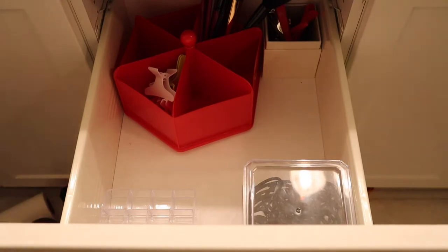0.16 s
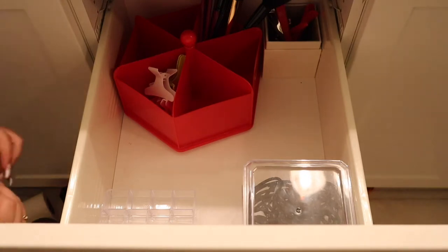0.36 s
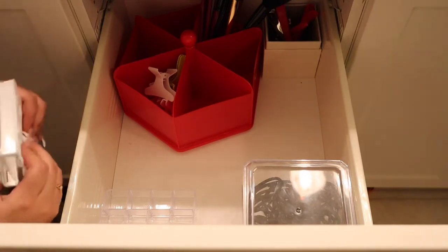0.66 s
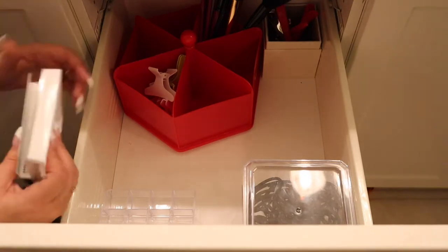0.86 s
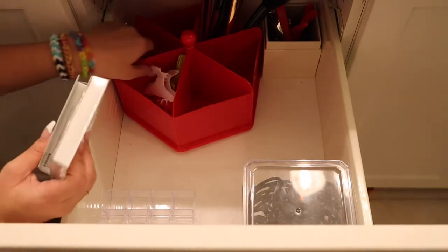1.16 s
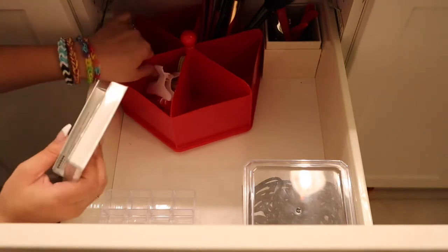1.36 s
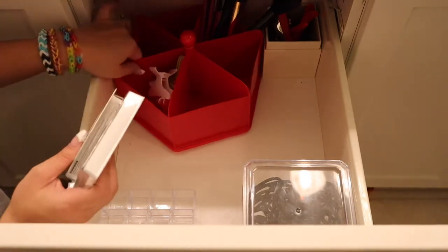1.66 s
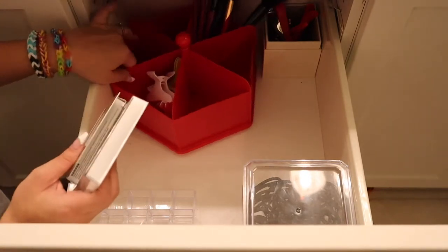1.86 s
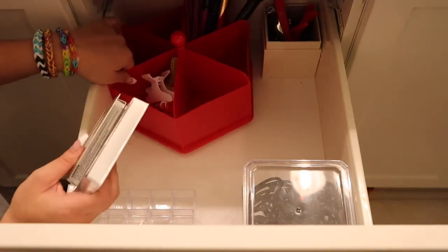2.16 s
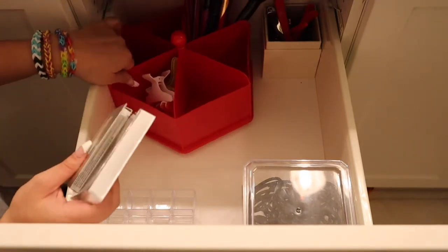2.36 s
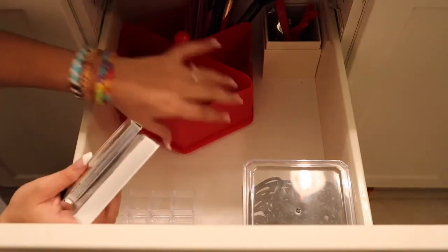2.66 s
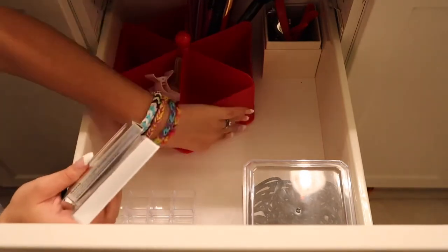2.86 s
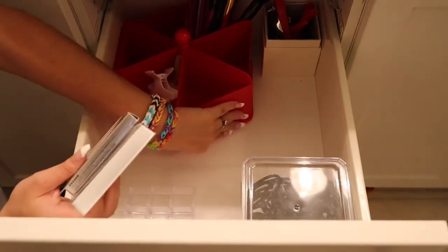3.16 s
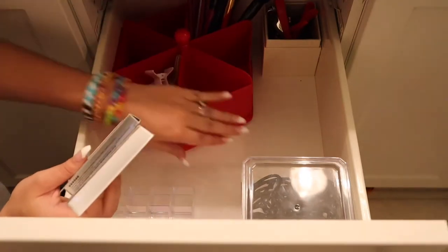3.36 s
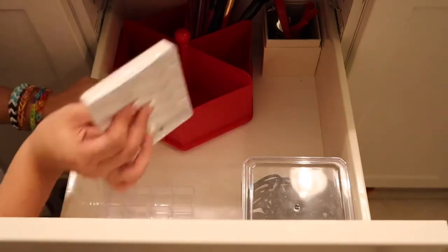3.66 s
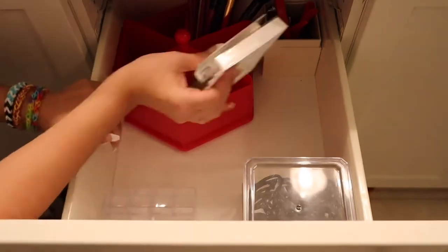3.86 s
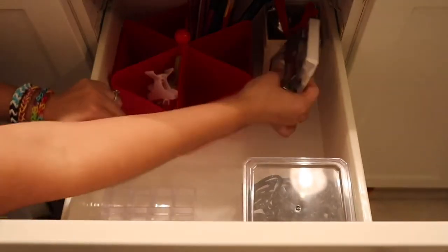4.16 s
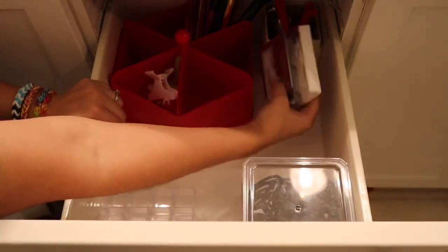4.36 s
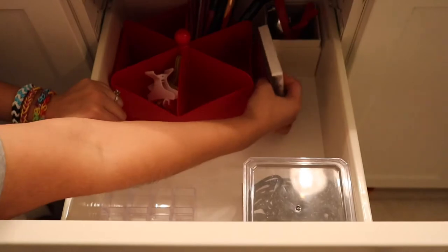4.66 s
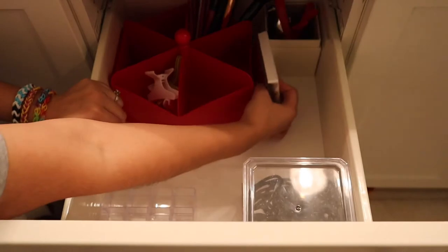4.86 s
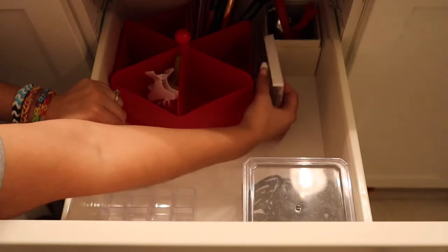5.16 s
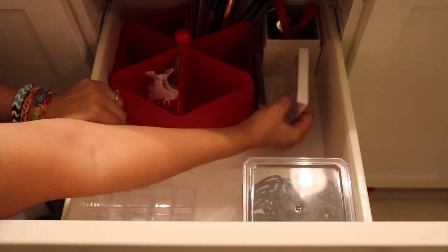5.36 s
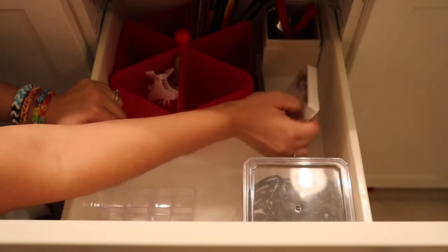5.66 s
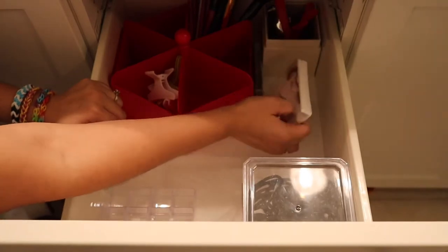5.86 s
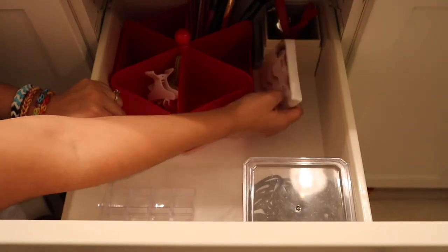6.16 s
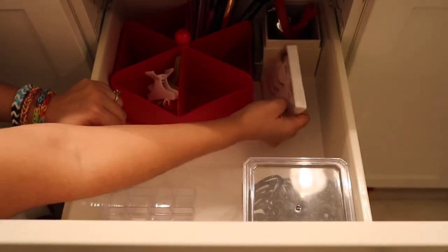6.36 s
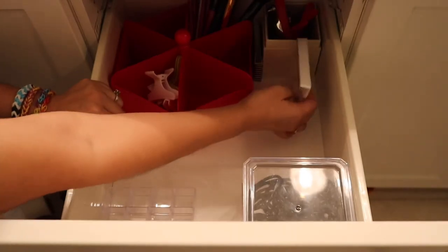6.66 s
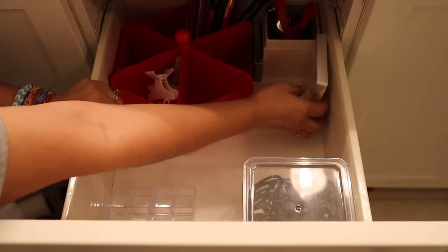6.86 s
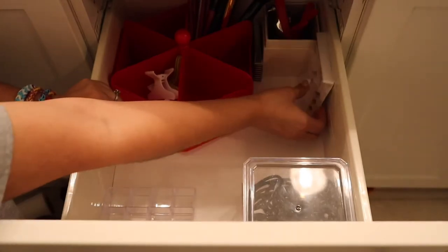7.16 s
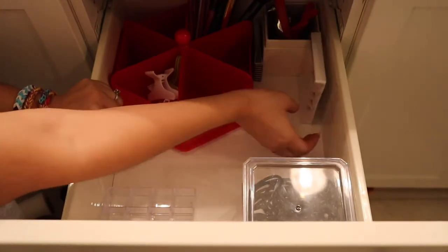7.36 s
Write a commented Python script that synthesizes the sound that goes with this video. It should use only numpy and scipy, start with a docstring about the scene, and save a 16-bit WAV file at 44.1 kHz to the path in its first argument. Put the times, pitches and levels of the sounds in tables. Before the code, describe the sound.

A steady, soft mid-toned hiss runs throughout, in a small room close to the microphone. From 0 to 1 s there is faint finger rubbing with tiny plastic ticks. At 1.07 s a sharp bright click sounds, followed by brushing, a short scrape and smaller taps; a louder, lower plastic snap comes at 1.43 s with light knocks. Around 1.9 to 2.0 s an organiser judders and hits the drawer with a strong hollow thud. Small taps follow, then another hard, brighter woody knock with a short scrape at 2.84 s. Near 3.55 to 3.75 s come rubbing and a cluster of light clicks. It then stays sparse: a soft knock at 4.4, a dull double bump at 5.0, ticks at 5.3. Rubbing and small taps return from 5.7, swelling before a loud plastic case clack at 6.84 s, with brief chatter and short room echo. Hiss and a faint tick at 7.15 s end it.

```python
"""A wooden drawer in a small room: hands rearrange makeup close to the microphone, over a steady hiss.
Fingers and a plastic organiser slide (friction noise); nails and small plastic parts click (crack and short ring).
Blows on the drawer combine contact noise with damped modes; a flat palette case finally clacks into its place
with its own modes and a chatter. Drawer walls and room add decaying echoes."""
import sys
import numpy as np
from scipy import signal
from scipy.fft import rfft, irfft, next_fast_len
from scipy.io import wavfile
from scipy.ndimage import uniform_filter1d

SR = 44100
rng = np.random.default_rng(int(sys.argv[2]) if len(sys.argv) > 2 else 0)


def transcribe(u):
    """Save the signal u as a 16-bit wav file named by the first command-line argument.

    u: samples, shape (n,) or (channels, n), limited to [-1, 1]; the rate is SR.
    q: integer samples, one column per channel.
    """
    v = np.clip(np.atleast_2d(u).T, -1, 1)
    q = np.round(v * 32767).astype(np.int16)
    wavfile.write(sys.argv[1], SR, q)


N = 330818
EVENT_SAMPLES = 7680
AGE = np.arange(EVENT_SAMPLES) / SR  # time since an impact [s]


def amp(db):
    """Level: decibels to amplitude gain."""
    return 10 ** (np.asarray(db) / 20)


def unit(x):
    """Power normalisation: scale to rms 1."""
    return x / np.sqrt(np.mean(x ** 2) + 1e-20)


def unit_hit(x):
    """Short-time power: scale so that the loudest hundredth of a second has rms 1."""
    return x / np.sqrt(uniform_filter1d(x ** 2, size=SR // 100).max() + 1e-20)


def along(points, hz):
    """Logarithmic frequency scale: interpolate (frequency [Hz], value) points."""
    point_hz, values = np.transpose(points)
    return np.interp(np.log(hz + 1), np.log(point_hz + 1), values)


def add(track, start, x):
    """Superposition: mix x into the track at start [s]."""
    part = track[max(round(start * SR), 0):][:len(x)]
    part += x[:len(part)]


def colour(x, spectrum, tilt=0):
    """Minimum-phase filtering: a causal filter with the given spectrum, tilted in dB per octave."""
    m = 2 * next_fast_len(len(x) // 2 + 256, True)
    hz = np.fft.rfftfreq(m, 1 / SR)
    # the tilt pivots at 1 kHz and is flat below 400 Hz
    slope = tilt * np.log2(np.maximum(hz, 400) / 1000)
    cepstrum = irfft(np.log(amp(along(spectrum, hz) + slope)))
    # folding the cepstrum onto positive time makes the filter causal
    cepstrum[1:m // 2] *= 2
    cepstrum[m // 2 + 1:] = 0
    response = np.exp(rfft(cepstrum))
    return irfft(rfft(x, m) * response)[:len(x)]


def fade(t60, t=AGE):
    """Exponential decay: 60 dB down after t60 [s]."""
    return np.exp(-np.log(1000) * t / t60)


def rattle(rise, t60, uneven_db=3):
    """Contact noise: dense tiny collisions of uneven size that build up and die away."""
    sizes = amp(uneven_db * np.repeat(rng.standard_normal(EVENT_SAMPLES // 48), 48))
    collisions = sizes * rng.standard_normal(EVENT_SAMPLES)
    build_up = np.minimum(AGE / max(rise, 1 / SR), 1)
    return collisions * build_up * fade(t60, np.maximum(AGE - rise, 0))


def ring(modes, scatter_db, waver_hz):
    """Modal superposition: damped modes of random strength, their pitch wavering with the shifting contact."""
    hz, db, t60 = np.transpose(modes)[:, :, None]
    strength = amp(db + scatter_db * rng.standard_normal(hz.shape))
    wavering = hz + waver_hz * rng.standard_normal((len(hz), EVENT_SAMPLES // 128))
    pitch = np.repeat(wavering, 128, axis=1)
    start_phase = rng.uniform(0, 2 * np.pi, hz.shape)
    phase = np.cumsum(pitch, axis=1) * (2 * np.pi / SR) + start_phase
    return np.sum(strength * fade(t60) * np.sin(phase.astype(np.float32)), axis=0)


def walls(x, walls_db, t60):
    """Early reflection: quick echoes inside the drawer, drawn anew for each sound."""
    t = AGE[:EVENT_SAMPLES // 3]
    echoes = rng.standard_normal(len(t)) * fade(t60, t) * (1 - fade(0.014, t))
    reflected = signal.fftconvolve(x, echoes / np.linalg.norm(echoes))[:len(x)]
    return x + amp(walls_db) * reflected


# hiss spectrum: (frequency [Hz], relative density [dB per Hz])
HISS_SPECTRUM = [(20, -31), (45, -18.5), (86, -16), (161, -15.5), (230, -14.5), (300, -11), (425, -13),
                 (620, -7.5), (800, -3), (1060, -1), (1600, -7.5), (2700, -12), (4100, -14), (10000, -21),
                 (15800, -28)]
HISS_DB = -41.5  # rms level


def hiss():
    """Stationary noise: the steady air noise of the room and the microphone's own hiss."""
    m = next_fast_len(N, True)
    gain = amp(along(HISS_SPECTRUM, np.fft.rfftfreq(m, 1 / SR)))
    shaped = rfft(rng.standard_normal(m)) * gain
    return amp(HISS_DB) * unit(irfft(shaped, m)[:N])


def friction(length, grains_per_s, grain_db):
    """Friction excitation: smooth rubbing with small random catches, swelling and ebbing over length [s]."""
    t = np.arange(2 * EVENT_SAMPLES) / SR
    catches = rng.standard_normal(len(t)) * (rng.random(len(t)) < grains_per_s / SR)
    swell = np.abs(np.sin(np.pi * np.minimum(t / length, 1))) ** 0.59
    return swell * (rng.standard_normal(len(t)) + amp(grain_db) * unit(catches))


# skin and plastic slide: (time [s], length [s], level [dB], brightness [dB per octave])
STROKES = [(0, 0.27, -43.5, -1.5), (0.559, 0.23, -43.5, 0.5), (1.121, 0.21, -38.5, 0.5),
           (1.441, 0.13, -39, -3), (2.33, .17, -43, -3), (3.545, 0.22, -37.7, 1), (5.228, 0.15, -45.5, -1),
           (5.76, 0.3, -40, -2.5), (6.097, 0.19, -47.5, 1), (6.468, 0.18, -45, -2),
           (6.658, 0.14, -41.5, -0.5), (6.74, 0.077, -33, -1), (6.868, 0.16, -37.5, -1.5)]
# rubbing spectrum: (frequency [Hz], relative density [dB per Hz])
RUB_SPECTRUM = [(100, -18.5), (300, -6.5), (800, 1), (1500, 0.5), (3000, -5), (5500, -3), (8000, -6.5),
                (11000, -23), (16000, -34)]
# the organiser judders along the floor: (time [s], length [s], level [dB])
DRAGS = [(1.135, 0.073, -32), (1.277, 0.04, -36), (1.91, 0.067, -31.5), (2.862, .04, -25), (5.74, .3, -42)]
# judder spectrum: (frequency [Hz], relative density [dB per Hz])
JUDDER_SPECTRUM = [(100, -34), (300, -14), (550, -9.5), (760, -4), (1000, -8.5), (1500, -20), (5000, -47)]


def slides():
    """Sliding friction: fingers brush over plastic; the organiser sticks and slips on the drawer floor."""
    out = np.zeros(N)
    for start, length, db, tilt in STROKES:
        rubbing = friction(length, grains_per_s=400, grain_db=-1.5)
        rub = unit_hit(colour(rubbing, RUB_SPECTRUM, tilt))
        add(out, start, amp(db) * walls(rub, walls_db=-5.0, t60=0.025))
    for start, length, db in DRAGS:
        dragging = friction(length, grains_per_s=260, grain_db=1.5)
        judder = unit_hit(colour(dragging, JUDDER_SPECTRUM))
        add(out, start, amp(db) * walls(judder, walls_db=-10, t60=0.06))
    return out


# spectrum of plastic contacts, for clicks and clack: (frequency [Hz], relative density [dB per Hz])
PLASTIC_SPECTRUM = [(100, -35), (350, -18), (600, -4), (1100, -0.5), (1700, -4), (2400, 0), (4000, -0.5),
                    (6000, -2), (8000, -5), (11000, -21.5), (16000, -44)]
CLICK_T60_S = .045  # decay of the contact noise


def click(db, hz, ring_db, tilt):
    """Light impact of a nail or small plastic part: a crack and a short ring of three close modes."""
    short = EVENT_SAMPLES // 2
    contact = rattle(0.0009, CLICK_T60_S, uneven_db=2.0)[:short]
    crack = unit_hit(colour(contact, PLASTIC_SPECTRUM, tilt))
    modes = [(hz, 0, .024), (hz * 1.11, -3, .02), (hz * 1.1, -6, .016)]  # (Hz, dB, t60 s)
    tone = unit_hit(ring(modes, scatter_db=0.0, waver_hz=70)[:short])
    return amp(db) * walls(unit_hit(crack + amp(ring_db) * tone), walls_db=-9.5, t60=0.052)


# nails catch at random while the fingers slide; level is relative to the stroke, ring to the crack
TICKS_PER_S, TICK_DB, TICK_RING_DB = 12, 0, -9
TICK_HZ, TICK_SPREAD_OCTAVES = 4000, .5


def ticks(count=4):
    """Stick-slip catches: up to count nail clicks scattered along each stroke, at the stroke's level."""
    out = np.zeros(N)
    for start, length, db, tilt in STROKES:
        delays = (np.arange(count) + rng.random(count)) / TICKS_PER_S
        detunings = TICK_SPREAD_OCTAVES * rng.standard_normal(count)
        for delay, octaves in zip(delays, detunings):
            tick = click(db + TICK_DB, TICK_HZ * 2 ** octaves, TICK_RING_DB, tilt)
            # a tick after the end of its stroke is silent
            add(out, start + delay, (delay < length) * tick)
    return out


# distinct contacts: (time [s], level [dB], ring [Hz], ring over crack [dB], brightness [dB per octave])
CLICKS = [(.251, -37, 6700, -16, -2), (0.3754, -27.5, 2170, -3, 3), (.629, -38.5, 5000, -9, 1),
          (.729, -36.5, 1460, -4, -4), (1.070, -15.5, 3650, -4, -.2), (1.099, -29.5, 1190, -3, -2),
          (1.193, -27.3, 5300, -5, -.5), (1.228, -30, 4350, -1, 2), (1.283, -33, 1540, -3, -3),
          (1.4262, -14.7, 2150, -12, .6), (1.498, -29, 2300, -8, 1), (1.5194, -21, 2340, -11, -.6),
          (1.6422, -28, 4430, -4, -1.5), (1.727, -30.5, 3900, 0, -3), (2.152, -34, 3300, -9, -3.5),
          (2.369, -39, 7900, 3, 4), (2.41, -30.5, 2150, -4, -.5), (2.468, -36.5, 3480, -15, -4),
          (3.577, -30.5, 5120, -2, 2), (3.637, -28.5, 6340, -6, 1.5), (3.700, -27, 5500, -5, .5),
          (3.7265, -24.5, 1260, 3, 1), (3.993, -37, 5550, -18, 1), (5.0266, -32, 5780, -2, 0.5),
          (5.298, -37, 2400, -3, 2), (5.340, -34.5, 4690, -3, 2), (5.7248, -37.5, 2520, -2, -1),
          (5.833, -32, 7600, -13, 3), (5.9463, -33.5, 4450, -20, .5), (6.0814, -29, 3550, -1, 0.5),
          (6.483, -34, 3700, -8, -2.5), (6.5218, -31, 3550, -13, 2), (6.8392, -23.5, 7670, -5, 2),
          (7.1494, -35, 6400, -3.5, 8)]


def clicks():
    """Impact sequence: the distinct contacts of nails, case and organiser."""
    out = np.zeros(N)
    for start, db, hz, ring_db, tilt in CLICKS:
        add(out, start, click(db, hz, ring_db, tilt))
    return out


# modes of organiser and drawer floor: (frequency [Hz], level [dB], t60 [s])
DRAWER_MODES = [(122.3, -2.5, 0.18), (158, -0.5, 0.11), (225, -5, .13), (270, -1, 0.12), (306.7, 0, .23),
                (344, -9, 0.088), (469, -2, 0.16), (497, 1, .13), (564, -10.5, 0.097), (667.5, -0.5, 0.12),
                (748, 1, 0.096), (867, 0, 0.12), (950, 1, 0.051)]
# contact spectrum of a knock: (frequency [Hz], relative density [dB per Hz])
WOOD_SPECTRUM = [(25, -50), (60, -35), (110, -23), (200, -9), (280, -6.5), (400, -8), (600, -2),
                 (850, -0.5), (1200, -9.5), (2300, -7), (3000, -12.5), (5000, -12), (7500, -18.5),
                 (10000, -30.5), (16000, -59)]
KNOCK_T60_S = .125  # decay of the contact noise
# low, dull blows boom more: (dB at the reference, dB per octave of centre, dB per unit of brightness)
BOOM_DB, BOOM_DB_PER_OCTAVE, BOOM_DB_PER_TILT = -1.2, -0.8, -0.9
BOOM_REFERENCE_HZ = 400


def blow(db, rise, centre_hz, tilt, falloff_db=14):
    """Modal excitation: the spot struck favours modes around one centre, under the contact noise."""
    contact = unit_hit(colour(rattle(rise, KNOCK_T60_S), WOOD_SPECTRUM, tilt))
    modes = []
    for hz, level, t60 in DRAWER_MODES:
        octaves_away = abs(np.log2(hz / centre_hz))
        modes.append((hz, level - falloff_db * octaves_away, t60))
    onset = 1 - np.exp(-2 * AGE / rise)
    boom = unit_hit(ring(modes, scatter_db=1, waver_hz=18) * onset)
    centre_octaves = np.log2(centre_hz / BOOM_REFERENCE_HZ)
    boom_db = BOOM_DB + BOOM_DB_PER_OCTAVE * centre_octaves + BOOM_DB_PER_TILT * tilt
    return amp(db) * walls(contact + amp(boom_db) * boom, walls_db=-10, t60=0.038)


# blows on the drawer:
# (time [s], level [dB], rise [s], centre of the struck modes [Hz], brightness [dB per octave])
KNOCKS = [(1.404, -40, .009, 200, 0), (1.428, -29.5, .002, 890, 2), (1.523, -28.5, .003, 950, 1),
          (1.905, -23.3, .003, 280, -1.4), (1.955, -27.5, .005, 320, -.3), (1.986, -16.6, .003, 260, 0.7),
          (2.138, -36.5, 0.0036, 480, 1), (2.325, -35.5, .001, 250, -1.2), (2.36, -38, .006, 720, -1.5),
          (2.820, -29, .014, 600, 0.5), (2.835, -32, .005, 120, .5), (2.841, -16.6, .009, 740, 1.3),
          (2.912, -35, .003, 296, 1.5), (3.031, -48, .003, 240, -4), (3.227, -34.5, .007, 420, -3),
          (3.704, -38, 0.0018, 360, -3), (3.747, -34.5, 0.0066, 195, -3.5), (4.375, -29.7, .005, 790, -1.4),
          (4.765, -41, .003, 800, 0.5), (5.001, -26.5, .002, 700, -1.2), (5.008, -31.5, .002, 260, -1),
          (5.026, -30.5, .0014, 660, -1.5), (5.338, -38.5, .002, 900, 1), (5.828, -30.5, .004, 950, -.7),
          (5.940, -37, .01, 750, -0.5), (6.484, -47.5, .002, 250, -2), (7.084, -41, .001, 1000, 0)]
# after a blow the organiser rocks back on its base, the more so the harder it was struck
SETTLE_S, SETTLE_RISE_S, SETTLE_HZ = .012, 0.0028, 290
SETTLE_DB, SETTLE_GROWS, HARD_BLOW_DB = -3.7, .8, -17  # GROWS: extra dB per dB of blow above HARD_BLOW_DB


def knocks(lowest_hz=115):
    """Impact and rebound: blows on the drawer, each followed by the organiser settling."""
    out = np.zeros(N)
    for start, db, rise, centre_hz, tilt in KNOCKS:
        add(out, start, blow(db, rise, centre_hz, tilt))
        settle_db = db + SETTLE_DB + SETTLE_GROWS * (db - HARD_BLOW_DB)
        add(out, start + SETTLE_S, blow(settle_db, SETTLE_RISE_S, SETTLE_HZ, tilt))
    # a panel this small radiates little deep bass
    high_pass = signal.butter(2, lowest_hz, "high", fs=SR, output="sos")
    return signal.sosfilt(high_pass, out)


# the case lands on its edge: (time [s], level [dB], crack t60 [s], shell ring over crack [dB])
CLACK = (6.8428, -15, 0.01, 2)
# modes of the palette case: (frequency [Hz], level [dB], t60 [s])
CASE_MODES = [(730, -17.5, 0.044), (946, -4, 0.049), (1190, -9, 0.04), (1493, -11.5, 0.05),
              (2120, -1.5, .018), (2410, 5, .022), (2640, -4, 0.016), (3260, -4.5, 0.044),
              (3560, -3, 0.033), (4670, -8, 0.044), (6080, -11, .02), (7420, -9, 0.018)]
THUMP_DB, THUMP_HZ = -22, 260  # the landing shakes the drawer; level relative to the clack


def clack():
    """Coupled impact: the case drops against the drawer wall, its shell rings and its lid chatters."""
    out = np.zeros(N)
    start, db, crack_t60, ring_db = CLACK
    crack = unit_hit(colour(rattle(0.0019, crack_t60, uneven_db=1.5), PLASTIC_SPECTRUM, tilt=-.1))
    shell = unit_hit(ring(CASE_MODES, scatter_db=1.0, waver_hz=70) * (1 - fade(0.012)))
    chatter = unit_hit(colour(rattle(0.0046, 0.14), PLASTIC_SPECTRUM, tilt=-1.5))
    landing = crack + amp(ring_db) * shell + amp(-10.5) * chatter
    add(out, start, amp(db) * walls(landing, walls_db=-8.5, t60=0.072))
    add(out, start, blow(db + THUMP_DB, rise=0.0025, centre_hz=THUMP_HZ, tilt=0))
    return out


# reverberation time: (frequency [Hz], t60 [s])
ROOM_DECAY = [(120, 0.55), (300, 0.49), (800, 0.46), (2000, 0.43), (5000, 0.29), (12000, 0.16)]


def room(x, count=24):
    """Reverberation: a noise tail whose treble dies first; it changes as the hands move."""
    out, step = np.zeros(N), N // count + 1
    hz, t, noise = signal.stft(rng.standard_normal((count, SR // 2)), SR, nperseg=256)
    decay = fade(along(ROOM_DECAY, hz)[:, None], t)
    tails = signal.istft(noise * decay, SR, nperseg=256)[1]
    # the tail builds up gradually
    tails *= 1 - fade(0.04, np.arange(tails.shape[1]) / SR)
    # each of count successive stretches of sound has its own tail
    for start, tail in zip(range(0, N, step), tails):
        reverberant = signal.fftconvolve(x[start:start + step], tail / np.linalg.norm(tail))
        add(out, start / SR, reverberant)
    return out


def scene():
    """Superposition: all the handling, the room's answer and the steady background."""
    rubbing, plastic, wood, landing = slides(), ticks() + clicks(), knocks(), clack()
    sent = amp(-8.5) * wood + amp(-6.5) * plastic + amp(-10) * landing + amp(-7.5) * rubbing
    return (wood + plastic + landing + rubbing + room(sent) + hiss())[None]


TOP_HZ = 16000


def record(dry):
    """Saturation and band limiting: round off the very highest peaks, keep nothing above TOP_HZ."""
    rounded = dry / (1 + np.abs(dry / .85) ** 6) ** (1 / 6)
    m = next_fast_len(N + EVENT_SAMPLES)
    passband = np.fft.rfftfreq(m, 1 / SR) < TOP_HZ
    return irfft(rfft(rounded, m) * passband, m)[:, :N]


dry = scene()
out = record(dry)
transcribe(out)
```